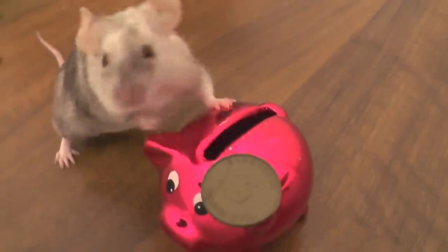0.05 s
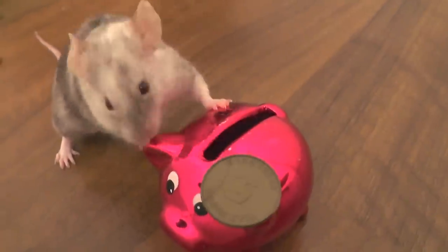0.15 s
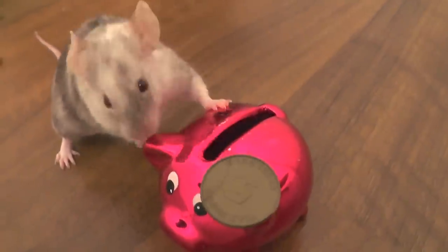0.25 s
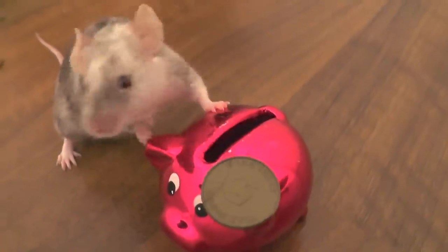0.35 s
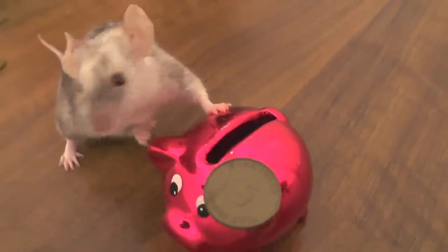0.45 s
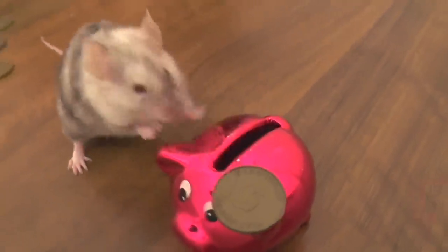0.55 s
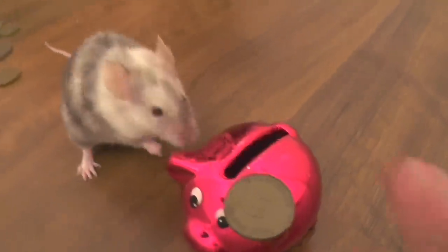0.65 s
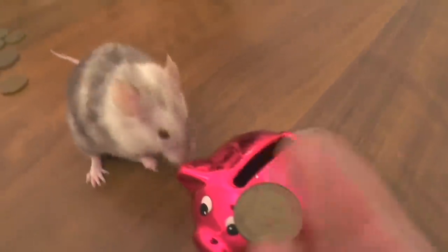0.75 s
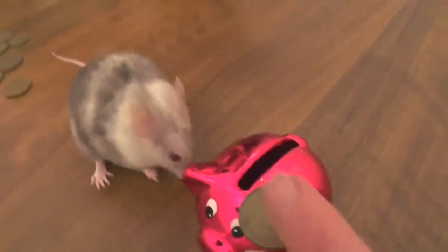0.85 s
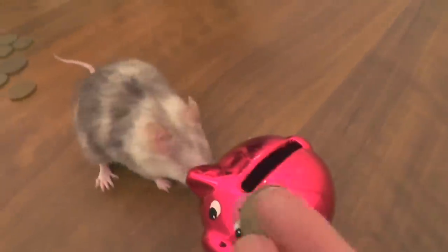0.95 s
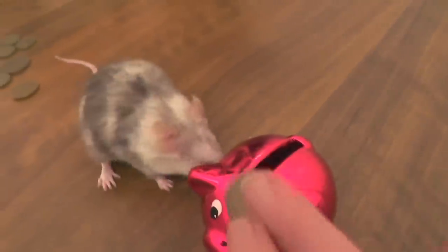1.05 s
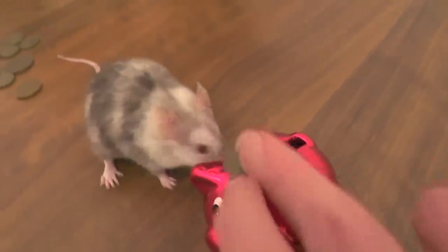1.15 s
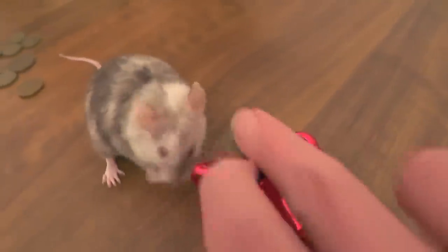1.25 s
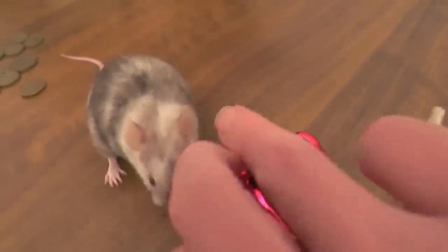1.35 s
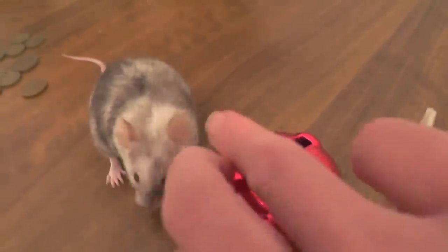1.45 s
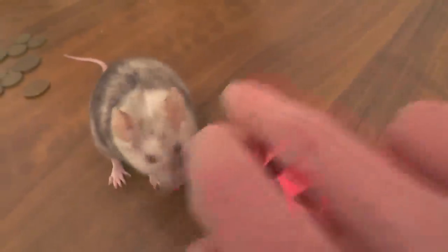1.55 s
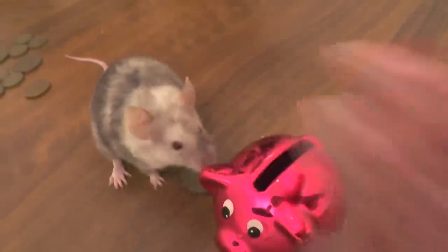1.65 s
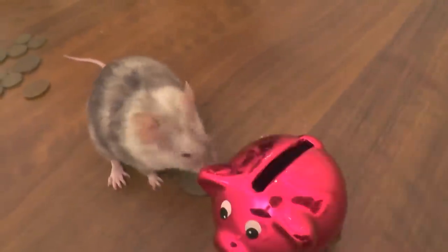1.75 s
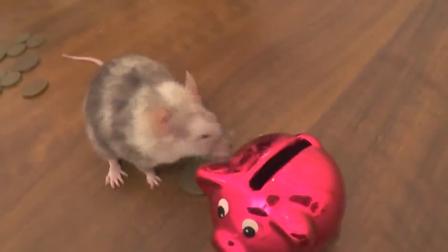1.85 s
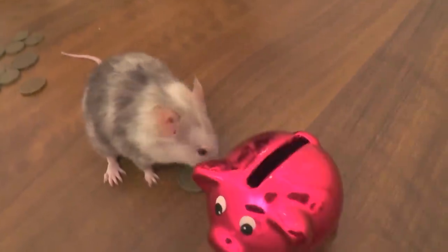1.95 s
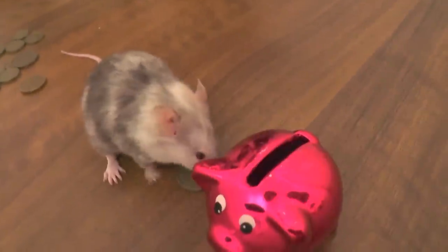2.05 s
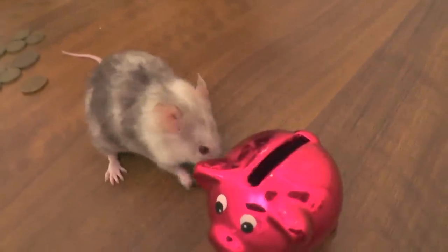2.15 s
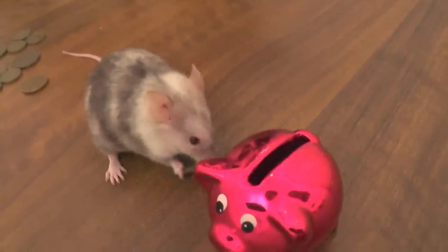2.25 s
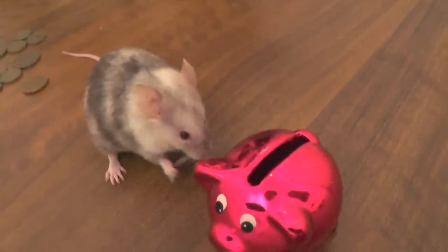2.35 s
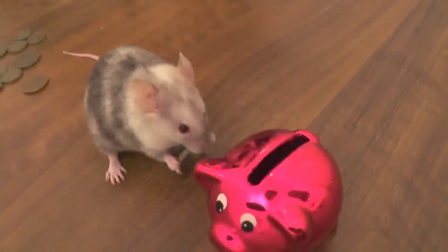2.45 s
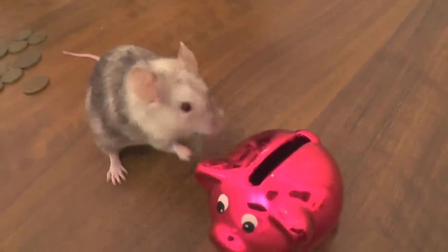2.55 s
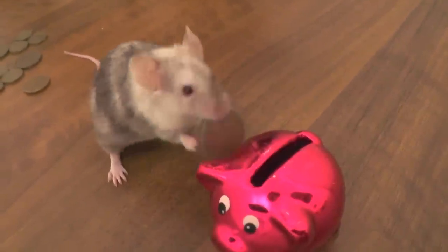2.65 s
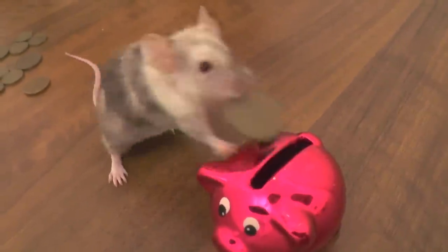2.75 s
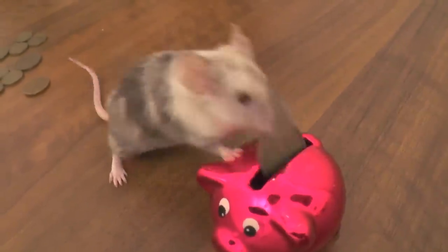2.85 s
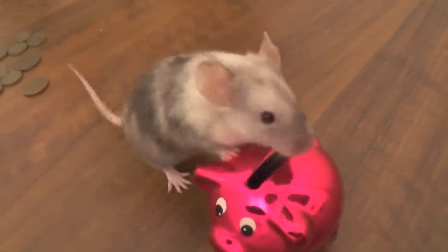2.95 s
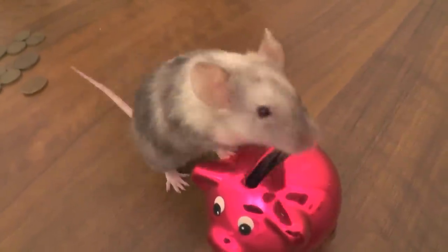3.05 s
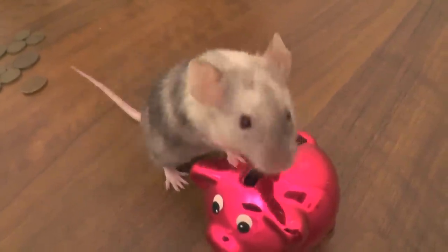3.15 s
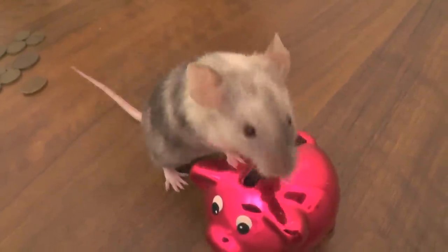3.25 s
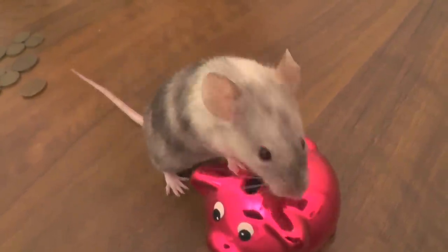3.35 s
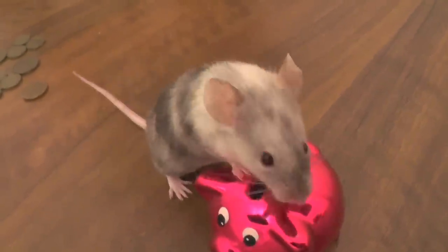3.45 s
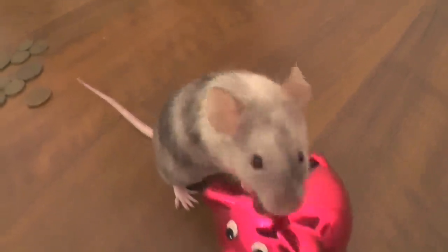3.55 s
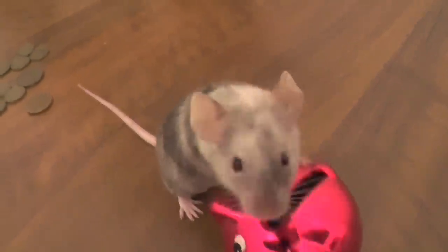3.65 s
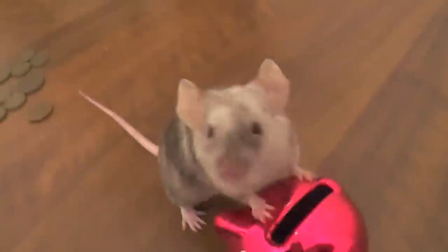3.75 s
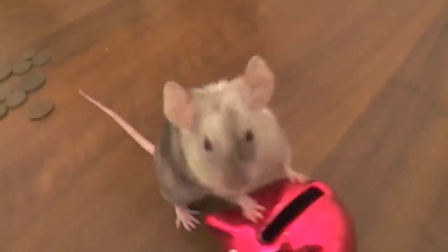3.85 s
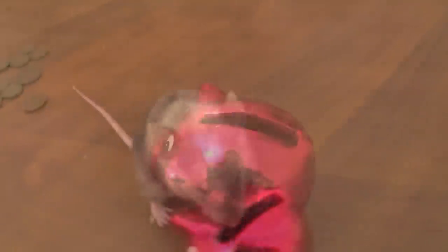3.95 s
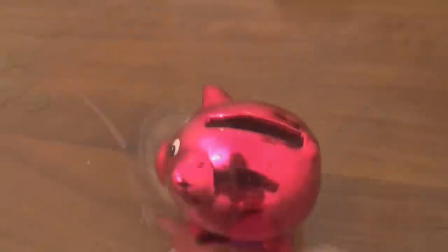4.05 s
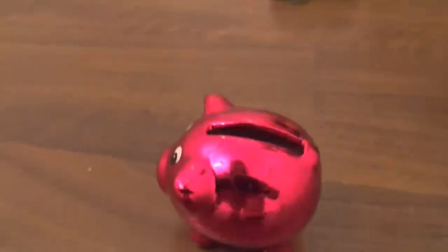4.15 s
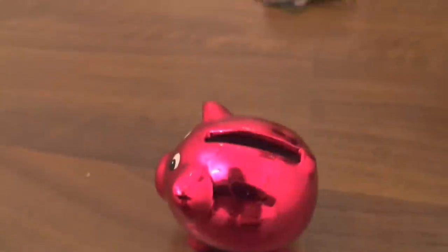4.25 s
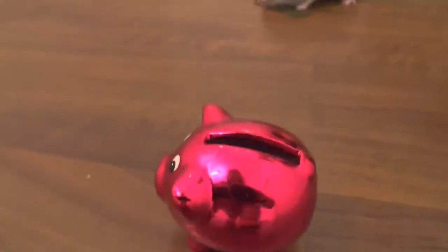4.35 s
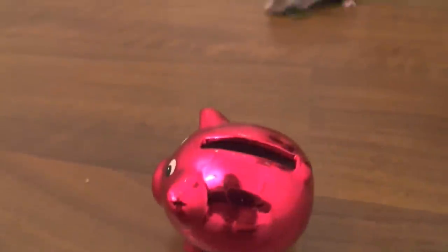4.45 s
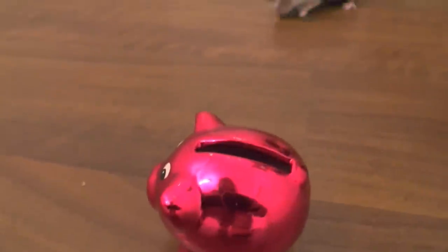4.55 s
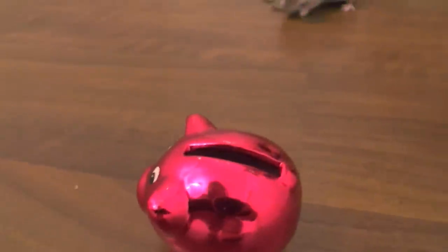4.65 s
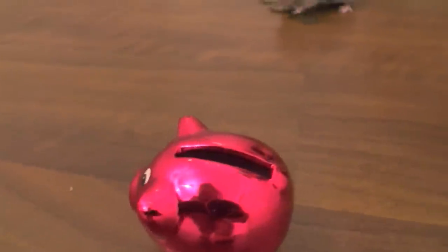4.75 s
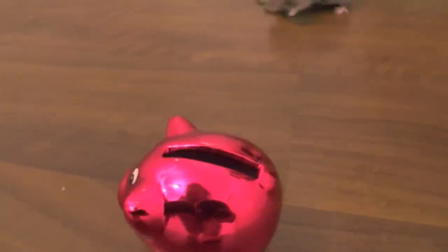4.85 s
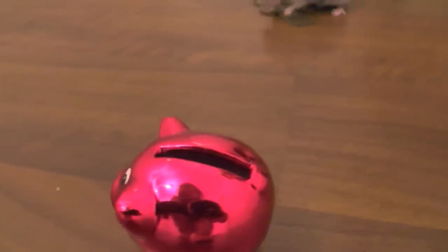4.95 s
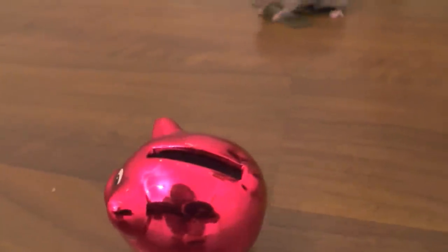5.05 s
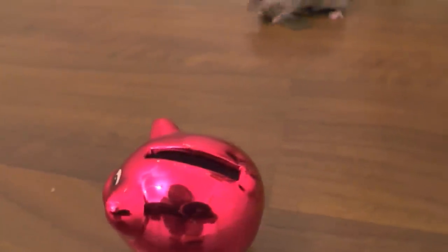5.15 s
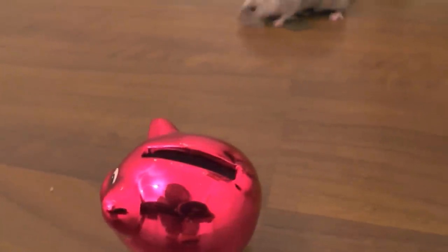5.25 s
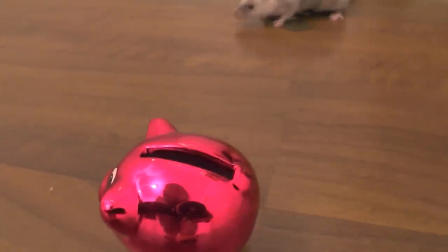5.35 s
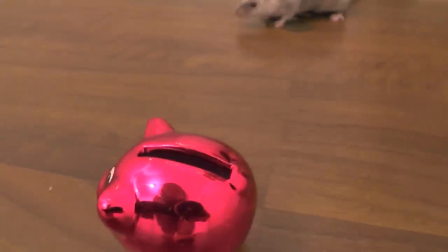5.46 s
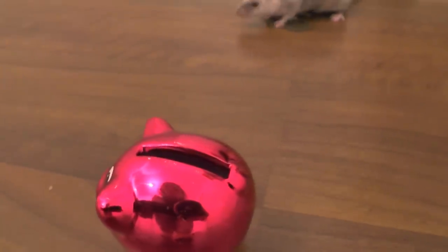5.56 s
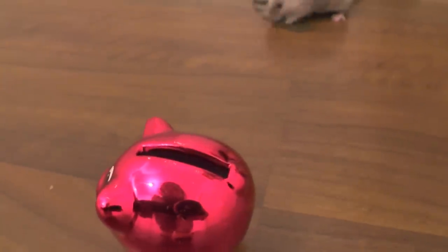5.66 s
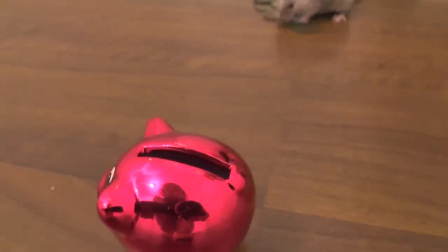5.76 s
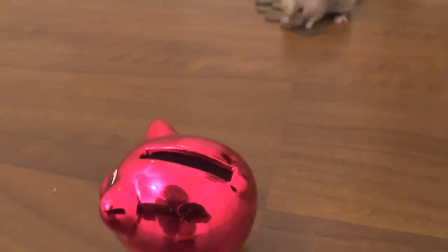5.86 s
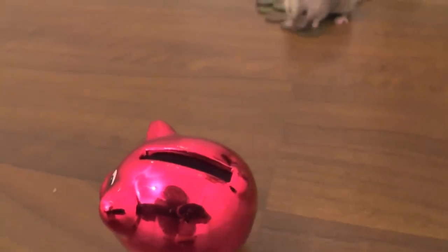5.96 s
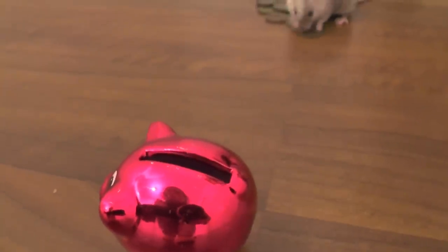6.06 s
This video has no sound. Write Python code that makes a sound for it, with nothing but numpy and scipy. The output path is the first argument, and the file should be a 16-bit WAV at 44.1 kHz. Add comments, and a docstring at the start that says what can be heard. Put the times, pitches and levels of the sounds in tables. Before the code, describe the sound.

A coin clatters on a wooden table and clinks against a small hollow piggy bank, then coins shift faintly further off.

```python
"""A coin, played with by a pet mouse around a small glossy piggy bank on a wooden table, close by.
The coin drops on the wood; the mouse picks it up, bumps the hollow bank and clinks the coin against it,
then rummages in a heap of coins further off. Blows and stick-slip friction excite damped modes of
wood, shell and metal. A bare, bright room rings after every click, over faint air, whine and hum."""
import sys
import numpy as np
from scipy import signal
from scipy.fft import rfft, irfft
from scipy.io import wavfile
from scipy.ndimage import uniform_filter1d, minimum_filter1d

SR = 44100
rng = np.random.default_rng(int(sys.argv[2]) if len(sys.argv) > 2 else 0)


def wav_record(signal):
    """Record a signal, one row per channel, as 16-bit PCM in the file named by sys.argv[1]."""
    frames = np.transpose(np.atleast_2d(signal))
    bounded = np.clip(frames, -1, 1)
    # unit amplitude maps onto the largest positive 16-bit level
    quanta = np.round(bounded * 32767).astype(np.int16)
    wavfile.write(sys.argv[1], SR, quanta)


N = 269872
T = np.arange(N) / SR
BLOW_T = T[:SR // 10]

# coin on wood, five registers (thud, knock, clack, ping, tick) of (frequency [Hz], level [dB], t60 [s])
WOOD_MODES = [
    [(490, 6, 0.049), (580, 5, 0.043)],
    [(1332, -8.5, 0.007), (1630, 1, 0.0036), (2510, -1.5, 0.0045)],
    [(3770, 0.5, 0.0048), (4210, 9.5, 0.0031), (4950, 5, 0.0018)],
    [(6180, -6.5, 0.0018), (7200, -9, 0.0042)],
    [(10700, 0, 0.00085), (12440, -6, 0.0018), (14700, 0.5, 0.00068)],
]


def undb(db):
    """Decibels to gain."""
    return 10 ** (np.asarray(db) / 20)


def add(track, start_s, x):
    """Mix x into the track from start_s."""
    i = int(round(start_s * SR))
    track[i:i + len(x)] += x[:N - i]


def with_send(x, room_db):
    """Stack the direct sound and its room send."""
    return np.array([x, x * undb(room_db)])


def along(points, hz, column=1):
    """Interpolate a table column over log frequency."""
    points = np.array(points)
    return np.interp(np.log(hz + 1e-9), np.log(points[:, 0]), points[:, column])


def colour(x, points):
    """Filter by a (frequency [Hz], gain [dB]) curve."""
    hz = np.arange(N // 2 + 1) * SR / N
    return irfft(rfft(x) * undb(along(points, hz)), N)


def highpass(x, hz, order=3):
    """Butterworth low cut."""
    return signal.sosfilt(signal.butter(order, hz, "high", fs=SR, output="sos"), x)


def ring(modes, t, spread):
    """Damped modes; each contact point shifts their pitch and weight a little."""
    out = 0
    for hz, db, t60_s in modes:
        shift, weight = rng.standard_normal(2)
        wave = np.sin(2 * np.pi * hz * (1 + spread * shift) * t)
        out = out + undb(db + 2 * weight) * wave * np.exp(-np.log(1000) * t / t60_s)
    return out


def strike(modes, db, chatter, chatter_s, spread):
    """One contact plus dying chatter, shorter in the treble; energy equals 8 ms at db."""
    lowest_hz = modes[0][0]
    force = rng.standard_normal(len(BLOW_T)) * np.exp(-BLOW_T / chatter_s * (1 + (lowest_hz / 4500) ** 2))
    force *= chatter / np.linalg.norm(force)
    force[0] += 1
    x = signal.fftconvolve(force, ring(modes, BLOW_T, spread))[:len(BLOW_T)]
    x = highpass(x, 0.8 * lowest_hz)  # a small body radiates little below its lowest mode
    return x * undb(db) * np.sqrt(0.008 * SR / np.sum(x ** 2))


def clink(registers, voice_db, db, hardness_db_oct, ping_db, **contact):
    """One blow on five registers: hardness tilts the treble, a rim hit adds ping."""
    knee_hz = 1510
    octaves = np.maximum(np.log2([modes[0][0] / knee_hz for modes in registers]), 0)
    levels_db = db + np.array(voice_db) + hardness_db_oct * octaves
    levels_db[3] += ping_db
    return sum(strike(modes, level_db, **contact) for modes, level_db in zip(registers, levels_db))


def friction(start_s, end_s, db, modes, rate_hz, scatter_db):
    """Irregular slips of uneven size, fading as the motion stops, excite a body's modes."""
    chance, size = rng.random(SR), rng.standard_normal(SR)
    n = int(np.clip((end_s - start_s) * SR, 100, SR))
    slips = (chance < rate_hz / SR) * undb(scatter_db * size) * np.sign(size)
    force = (slips + 0.033 * size)[:n] * np.linspace(1, 0.5, n)
    x = highpass(signal.fftconvolve(force, ring(modes, BLOW_T, spread=0.0064)), 370)
    return x * undb(db) * np.sqrt(n / np.sum(x ** 2))


def tones(lines):
    """Steady tones that waver slightly."""
    out = 0
    for hz, db in lines:
        drift_rad = np.cumsum(rng.standard_normal(N)) * hz * 2e-5
        out = out + np.sqrt(2) * undb(db) * np.sin(2 * np.pi * hz * T + drift_rad)
    return out


def background(air_db=-61.5, hum_from_s=3.98):
    """Room air, microphone hiss, a faint whine and a hum that sets in late."""
    # air and hiss spectrum: (frequency [Hz], relative density [dB])
    air_spectrum = [(15, -33.5), (28, -17), (53, -7), (120, -8.5), (300, -14), (480, -12.5), (700, -18),
                    (1000, -21.5), (1370, -17.5), (2100, -22), (2900, -16), (5500, -26.5), (8300, -28),
                    (10500, -22.5), (16000, -23)]
    # its stereo width: (frequency [Hz], side minus mid [dB])
    air_side = [(60, -13.5), (300, -1), (700, 0.5), (2400, -24), (16000, -27.5)]
    # whine: (frequency [Hz], level [dB])
    whine = [(1373, -80.5), (2859, -83)]
    # electric hum: (frequency [Hz], level [dB])
    hum = [(100, -71), (199.5, -73.5)]
    air = [colour(rng.standard_normal(N), air_spectrum) for _ in range(2)]
    mid, side = (x * undb(air_db) / np.sqrt(np.mean(x ** 2)) for x in air)
    side = colour(side, air_side)
    mid = mid + tones(whine) + tones(hum) * np.clip((T - hum_from_s) * 10, 0, 1)
    return np.array([mid + side, mid - side])


def room(x, width, build_s=0.0085):
    """Dense reflections build up fast and die away, the midrange last."""
    # reverberation: (frequency [Hz], band level [dB], t60 [s])
    reverb = [(150, 1, 0.5), (300, -11, 1), (503, -9, 0.89), (1300, -9, 1.61), (2600, -5, 1.5),
              (4040, -6, 1.27), (6650, -5.5, 0.76), (8010, -8, 0.64), (9400, -12, 0.56), (15560, -15, .36)]
    t = T[:int(1.4 * SR)]
    hz = np.arange(len(t) // 2 + 1) * SR / len(t)
    centres_hz = np.geomspace(150, 16000, 16)
    noise = rfft(rng.standard_normal((2, len(t))))
    onset = 1 - np.exp(-(t / build_s) ** 2)
    response = 0
    for centre_hz, pick in zip(centres_hz, np.eye(len(centres_hz))):
        fade = onset * np.exp(-np.log(1000) * t / along(reverb, centre_hz, column=2))
        band = irfft(noise * np.interp(hz, centres_hz, pick), len(t))
        response = response + band * fade / np.linalg.norm(fade) * undb(along(reverb, centre_hz))
    mid, side = (signal.fftconvolve(x, r)[:N] for r in response)
    return np.array([mid + width * side, mid - width * side])


def placed(source, width, mirror_db):
    """Stereo from (direct, send): the table top mirrors it differently to each side; the room rings."""
    # table-top reflection: (frequency [Hz], side gain [dB])
    reflection = [(250, 3), (500, -0.5), (1200, -4), (2200, -9.5), (4000, -5), (8000, -2), (14000, -12.5)]
    direct, send = source
    delay_samples = int(rng.integers(8, 20))
    mirrored = colour(np.roll(direct, delay_samples), reflection) * undb(mirror_db)
    return np.array([direct + mirrored, direct - mirrored]) + room(send, width)


def thumps(recover_s=0.025, left_db=-5, right_db=5.5):
    """One-sided pressure pulses with a slow swing back."""
    # low thumps: (time [s], level [dB], half width [s])
    pulses = [(0.703, -49.5, 0.0012), (1.641, -43, 0.0014), (3.2777, -18.5, 0.002), (3.345, -48, 0.0025),
              (3.575, -47.5, 0.0017)]
    x = -sum(undb(db) * np.exp(-((T - s) / width_s) ** 2) for s, db, width_s in pulses)
    x = highpass(x, 1 / (2 * np.pi * recover_s), order=1)
    return np.array([x * undb(left_db), x * undb(right_db)])


def knock(start_s, db, room_db):
    """A hollow knock so near that each side differs; returns stereo and a send-only source."""
    # hollow body: (frequency [Hz], level [dB], t60 [s])
    modes = [(634, -7, 0.0083), (800, 2, 0.014), (1180, -8, 0.025), (1480, -19, 0.008)]
    stereo, echo = np.zeros((2, 2, N))
    shared = strike(modes, db, chatter=0.5, chatter_s=0.0047, spread=0.023)
    for side in stereo:
        add(side, start_s, shared + strike(modes, db + 5, chatter=1.8, chatter_s=0.0062, spread=0.083))
    add(echo[1], start_s, shared * undb(room_db))
    return stereo, echo


def shell_hz(time_s):
    """The bank's shell note, lower while a hand rests on it."""
    return 1191 if 1.0 < time_s < 1.6 else 1280


def patter_and_rubs():
    """Feet patter on the wood; skin and fur rub the bank."""
    # mouse feet: (start [s], end [s], level [dB])
    patter = [(0.608, 0.666, -64), (4.46, 5.3, -63.5)]
    # rubs on the bank: (start [s], end [s], level [dB])
    rubs = [(1.169, 1.191, -51.5), (1.244, 1.331, -47.5), (3.121, 3.242, -47.5)]
    wood = [(604, -1.5, 0.06), (677, 3.0, 0.037), (1093, 7.5, 0.012)]
    out = np.zeros(N)
    for start_s, end_s, db in patter:
        add(out, start_s, friction(start_s, end_s, db, wood, rate_hz=110, scatter_db=1.5))
    for start_s, end_s, db in rubs:
        shell = [(510, -9, 0.03), (shell_hz(start_s), 0, 0.026),
                 (3200, -11, 0.003), (6000, -13, 0.002), (14000, -3, 0.001)]
        add(out, start_s, friction(start_s, end_s, db, shell, rate_hz=500, scatter_db=0.5))
    return with_send(out, room_db=0.5)


def bumps(claw_db=-9):
    """Soft touches ring the bank's air cavity and shell; a claw tick marks the contact."""
    # paws and fingers on the bank: (time [s], cavity [dB], shell [dB])
    touches = [(0.166, -46.5, -70), (1.052, -56, -75), (1.1005, -60, -53.5), (1.141, -57, -54),
               (1.162, -53, -50.5), (1.2047, -49, -46.5), (1.2247, -61, -42.5), (1.2423, -84, -43.5),
               (2.8659, -27, -41), (3.0034, -55, -52.5), (3.2552, -38.5, -44.5)]
    cavity = [(521, 0, 0.025), (820, -17, 0.014)]
    claw = [(2690, 3.5, 0.0035), (4540, -8, 0.0019)]
    contact = dict(chatter=0.54, chatter_s=0.0023)
    out = np.zeros(N)
    for s, cavity_db, shell_db in touches:
        add(out, s, strike(cavity, cavity_db, chatter=0.2, chatter_s=0.001, spread=0.0082))
        add(out, s, strike([(shell_hz(s), 0, 0.022)], shell_db, spread=0.011, **contact))
        add(out, s, strike(claw, shell_db + claw_db, spread=0.055, **contact))
    return with_send(out, room_db=1.5)


def slide(start_s, end_s, db):
    """A coin slips over wood, exciting mostly the upper registers."""
    voice_db = (-16, -16, 4.5, 8.0, 0.5)
    wood = [(hz, mode_db + weight_db, t60_s)
            for modes, weight_db in zip(WOOD_MODES, voice_db) for hz, mode_db, t60_s in modes]
    return friction(start_s, end_s, db, wood, rate_hz=2000, scatter_db=0.5)


def coin_heap(rebound_s=0.0053, rebound_db=-4, slide_db=-53):
    """Far coins clink, fall back once and may slide on; distance makes the room send strong."""
    # shifted coins: (time [s], level [dB], hardness [dB/oct], slide length [s])
    shifts = [(3.984, -58, 3.5, 0.085), (4.2054, -58, -4, 0), (4.452, -51, -3.5, 0.1),
              (4.5386, -57.5, 0, 0.046), (4.608, -61.5, 3.5, 0.044), (4.711, -66, -1, 0.026),
              (4.8965, -53.5, 0.5, 0.0029), (4.9171, -48.5, -1, 0.0014), (4.943, -48, 1, 0.054),
              (5.3002, -58, 0, 0.0089), (5.3213, -48.5, 4, 0.0043), (5.7305, -62, 2.5, 0),
              (5.7701, -54.5, -1.5, 0.0053), (5.9818, -59.5, 2, 0.0016), (5.908, -68, -4, 0.0031),
              (6.083, -72, -13, 0.013)]
    # register balance: (thud, knock, clack, ping, tick) [dB]
    voice_db = (-3, 1, 6, -2, -2)
    contact = dict(ping_db=0, chatter=1.16, chatter_s=0.0068, spread=0.07)
    clinks, slides = np.zeros((2, N))
    for s, db, hardness_db_oct, slide_s in shifts:
        for lag_s, drop_db in ((0, 0), (rebound_s, rebound_db)):
            add(clinks, s + lag_s, clink(WOOD_MODES, voice_db, db + drop_db, hardness_db_oct, **contact))
        if slide_s > 0:
            add(slides, s, slide(s, s + slide_s, slide_db))
    return with_send(clinks, room_db=5.5) + with_send(slides, room_db=5)


def coin_slides():
    """The near coin scrapes over the table."""
    # slides: (start [s], end [s], level [dB])
    slides = [(0.619, 0.695, -65), (0.694, 0.704, -51), (1.627, 1.637, -26), (1.656, 1.695, -41.5),
              (2.309, 2.337, -57), (2.481, 2.615, -56)]
    out = np.zeros(N)
    for start_s, end_s, db in slides:
        add(out, start_s, slide(start_s, end_s, db))
    return with_send(out, room_db=-2)


def coin_ring():
    """Thin metal notes hang on when the coin is lifted and after its hardest blow."""
    # free coin: (frequency [Hz], level [dB], t60 [s])
    free_modes = [(2552, -7, 0.33), (4430, -11, 0.79), (5090, -12.5, 0.81), (5170, -20, 0.79),
                  (6320, -10.5, .9), (7070, -18, 0.86), (7450, -11.5, .7), (7500, -15, 0.66),
                  (9760, -1, 0.57), (10300, -6, .3), (10900, 3, 0.305), (12200, -2.5, .3),
                  (12700, -12, 0.3), (13940, -12.5, 0.45)]
    lift_modes = [(5090, 0, 0.2)]
    out = np.zeros(N)
    for start_s, db, modes in ((0.71, -73.5, lift_modes), (3.276, -44.5, free_modes)):
        note = ring(modes, T[:SR], spread=0.00043)
        add(out, start_s, note * undb(db) / np.std(note[:SR // 10]))
    return with_send(out, room_db=7)


def coin_judder():
    """Rapid contacts with the slot's edges drive the coin's shrill modes for milliseconds."""
    # bursts: (start [s], end [s], level [dB])
    bursts = [(3.2706, 3.274, -25), (3.2743, 3.2758, -5.5), (3.277, 3.2787, -16), (3.2798, 3.282, -12)]
    # coin in the slot: (frequency [Hz], level [dB], t60 [s])
    modes = [(2600, -18, 0.0087), (4450, -27.5, 0.0027), (5500, -5, 0.0028), (6980, -4.5, 0.013),
             (7240, 4, 0.0059), (9600, 1, .002), (12200, 0.5, .0014)]
    out = np.zeros(N)
    for start_s, end_s, db in bursts:
        add(out, start_s, friction(start_s, end_s, db, modes, rate_hz=5000, scatter_db=0))
    return with_send(highpass(out, 2700), room_db=-4.5)


def coin_on_bank():
    """The coin strikes the hollow bank and chatters against its shell."""
    # blows: (time [s], level [dB], hardness [dB/oct], rim ping [dB])
    hits = [(2.9138, -42.5, -0.5, 4), (3.0476, -26.5, 0, 0.5), (3.0915, -39, -0.5, 13.5),
            (3.1008, -34, -3, 4.5), (3.1082, -30.5, -2.5, -8), (3.117, -38.5, -3, 14.5),
            (3.137, -44, -1.5, 8), (3.2713, -51, 4.5, 20), (3.2863, -56.5, 7.5, 5)]
    # coin on bank, five registers of (frequency [Hz], level [dB], t60 [s])
    registers = [
        [(560, 10.5, 0.01535), (716, -12.5, 0.01)],
        [(1350, 9, 0.018), (1530, -3.5, 0.0076), (2630, -2, 0.0068)],
        [(4400, -9, 0.0023), (5130, 2, 0.0025), (6170, 6, 0.0023)],
        [(6260, -7, 0.0026), (6950, -18, 0.0096), (7500, -2, 0.0028)],
        [(10420, 23, 0.00089), (12700, -1, 0.001), (14200, 7.5, 0.0015)],
    ]
    # register balance: (thud, knock, clack, ping, tick) [dB]
    voice_db = (-5, -0.5, -2, 0.5, 2.5)
    out = np.zeros(N)
    for s, *blow in hits:
        add(out, s, clink(registers, voice_db, *blow, chatter=0.64, chatter_s=0.01, spread=0.015))
    return with_send(out, room_db=-0.5)


def coin_on_table():
    """The coin drops and taps on the wood with brief chatter."""
    # blows: (time [s], level [dB], hardness [dB/oct], rim ping [dB])
    hits = [(0.691, -52, 0, -3), (0.7005, -45, -7.5, 0), (1.579, -67.5, -1.5, 9), (1.594, -67, 1, 2),
            (1.6279, -25.5, 3.5, -6), (1.6373, -43.5, 3.5, 17.5), (1.6564, -48.5, 6, 11),
            (1.6668, -38, 6, 0), (1.672, -58.5, 11, 6), (2.3135, -54, -8, 9), (2.329, -57.5, -4.5, 3),
            (2.4743, -56, -1, 1), (2.4796, -49, -2.5, -8.5), (2.5133, -54.5, -5, 3),
            (2.5373, -62, -3.5, -10), (2.5576, -47.5, -3, -13.5), (2.6787, -38.5, 0.5, -2),
            (2.686, -49.5, -1.5, 4), (2.8125, -58, -1.5, -1)]
    # register balance: (thud, knock, clack, ping, tick) [dB]
    voice_db = (-7, 1, 4, 1.5, 1)
    out = np.zeros(N)
    for s, *blow in hits:
        add(out, s, clink(WOOD_MODES, voice_db, *blow, chatter=0.45, chatter_s=0.0035, spread=0.025))
    return with_send(out, room_db=-2)


def scene():
    """Coins on the table, in the heap and at the bank, handling noises and the quiet room."""
    table = coin_on_table() + coin_heap()
    bank = coin_on_bank()
    handling = bumps() + coin_slides() + patter_and_rubs()
    near_knock, knock_echo = knock(start_s=4.0465, db=-40.5, room_db=0.5)
    return (placed(table, width=0.067, mirror_db=-15)
            + placed(bank + coin_judder(), width=0.11, mirror_db=-16.5)
            + placed(handling + knock_echo + coin_ring(), width=0.16, mirror_db=-22.5)
            + thumps() + near_knock + background())


def record(dry):
    """A fast limiter holds down the loudest clinks; a steep low-pass cuts the top."""
    ceiling, release_s, top_hz = 0.54, 0.0021, 16000
    peak = np.maximum(np.abs(dry).max(axis=0), ceiling)
    held = np.exp(np.maximum.accumulate(np.log(peak) + T / release_s) - T / release_s)
    gain = uniform_filter1d(minimum_filter1d(ceiling / held, size=9), size=9)
    return signal.sosfilt(signal.ellip(8, 0.2, 70, top_hz, fs=SR, output="sos"), dry * gain)


dry = scene()
out = record(dry)
wav_record(out)
```